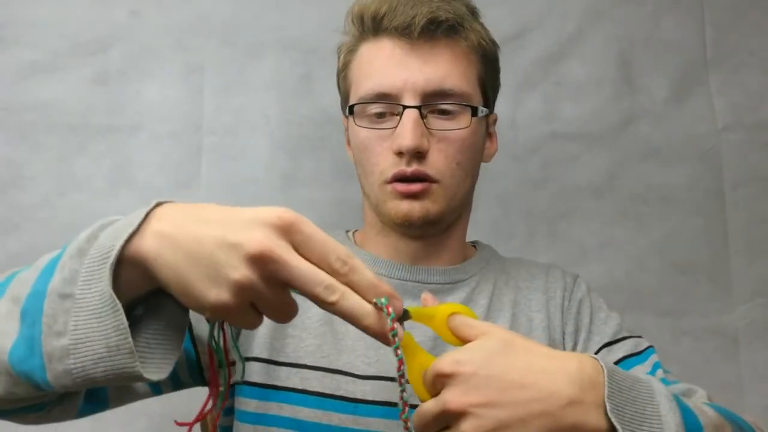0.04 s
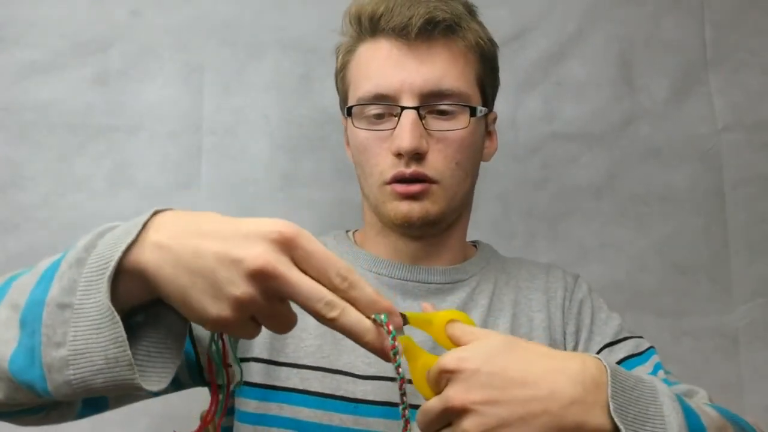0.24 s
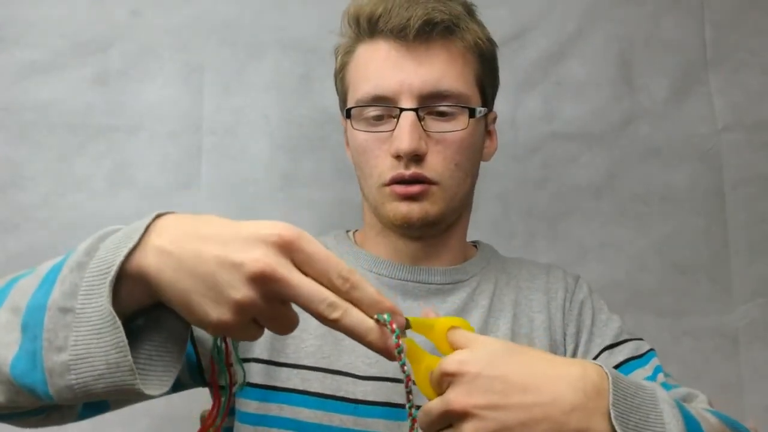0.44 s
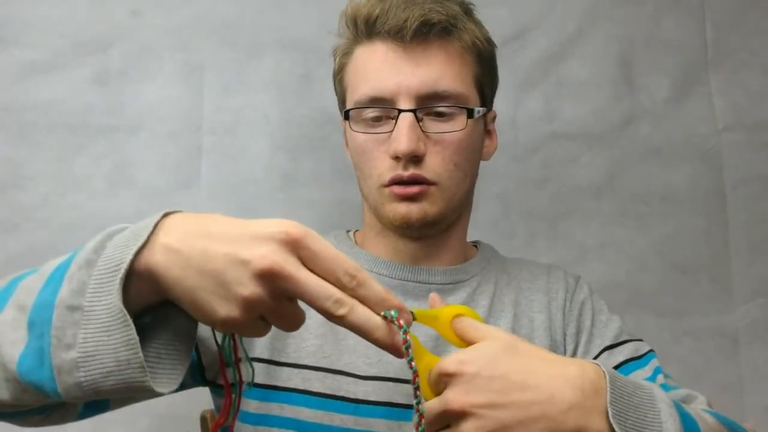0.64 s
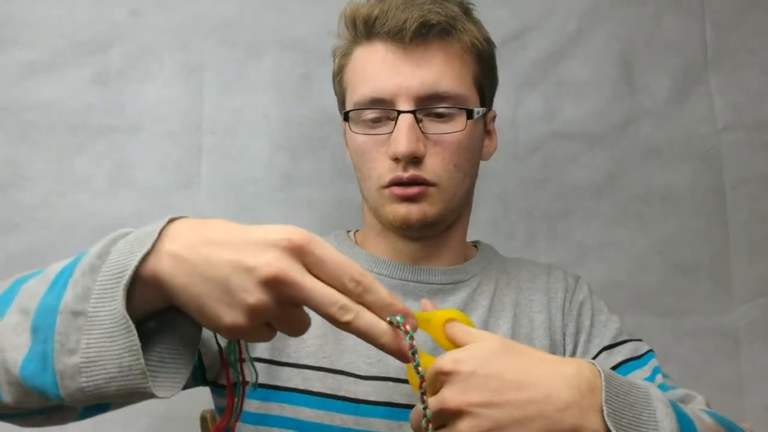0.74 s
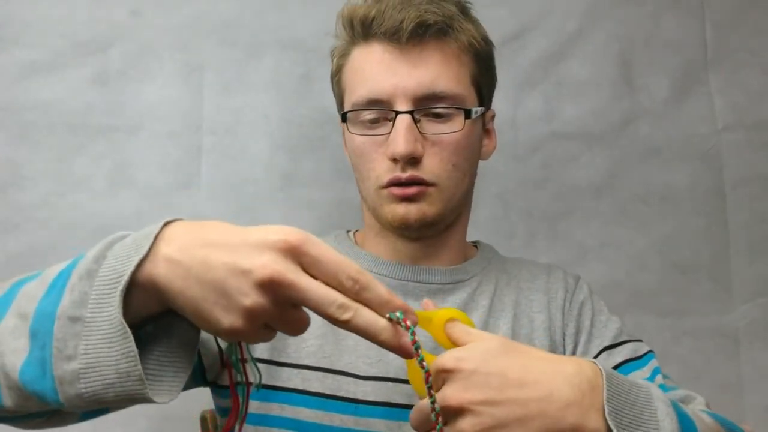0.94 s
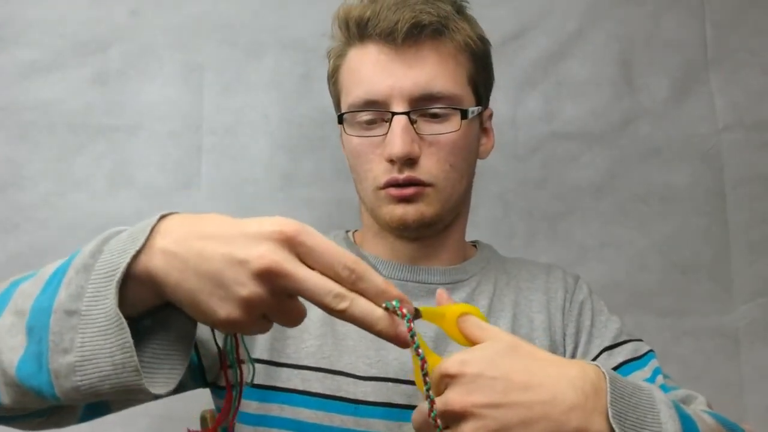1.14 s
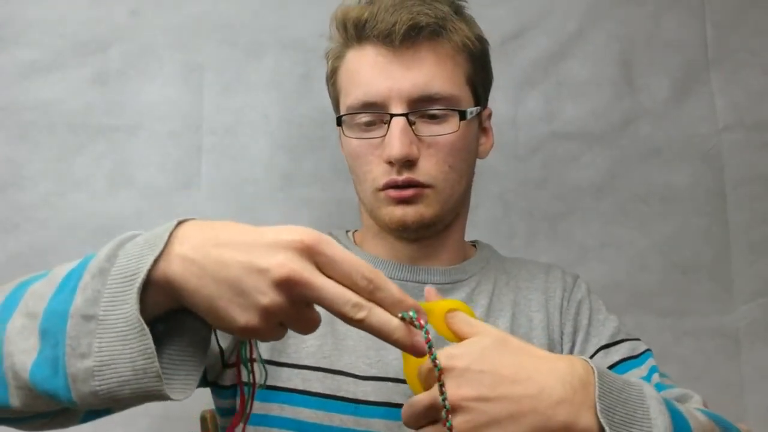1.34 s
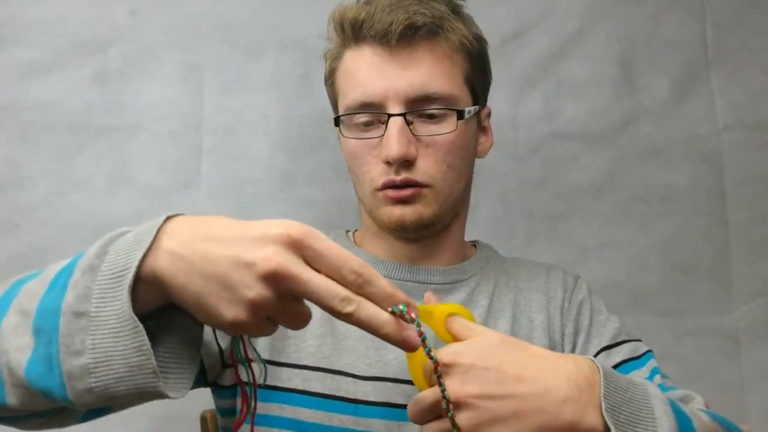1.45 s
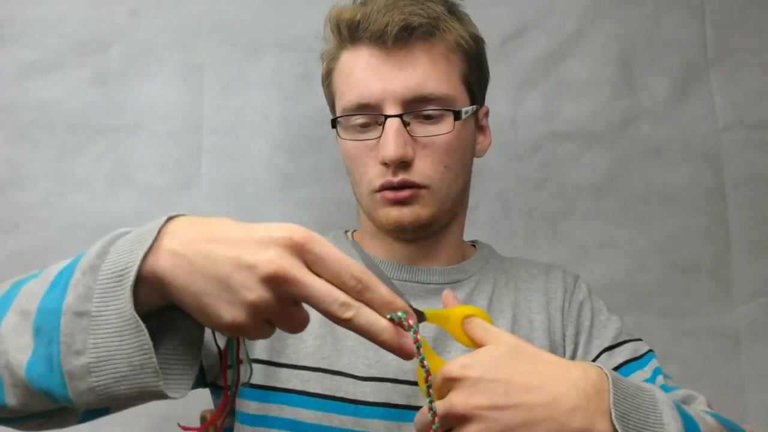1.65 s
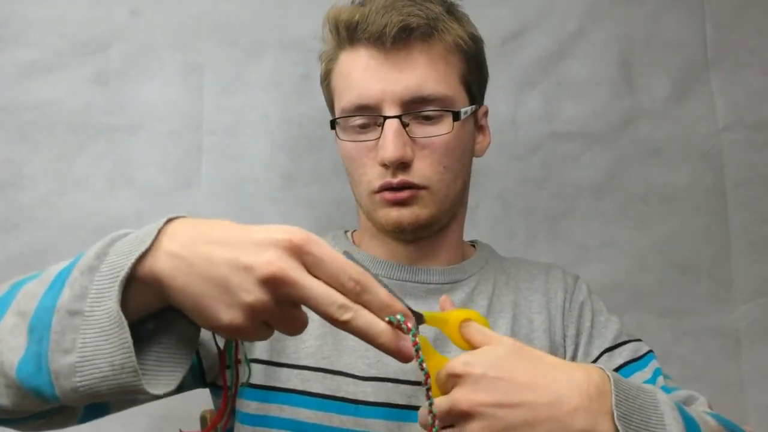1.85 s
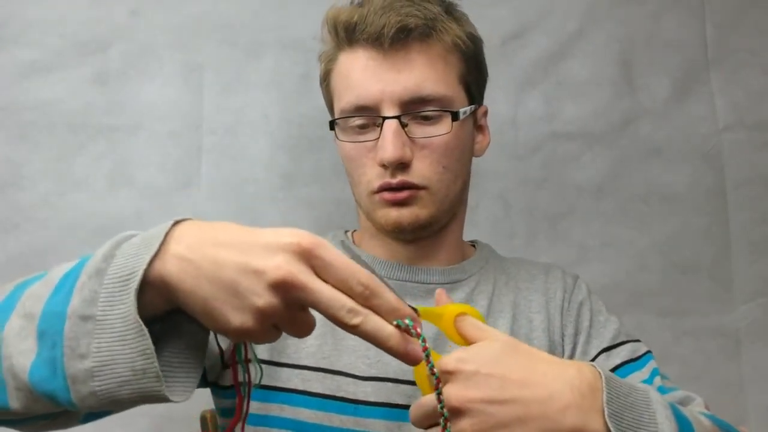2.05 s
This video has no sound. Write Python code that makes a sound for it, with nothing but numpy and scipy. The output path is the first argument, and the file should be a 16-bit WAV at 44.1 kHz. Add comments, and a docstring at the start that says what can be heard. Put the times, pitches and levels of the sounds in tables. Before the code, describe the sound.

Small scissors cut braided thread, close and slightly to the left. A brief crunch of parting strands at 0.1 seconds leads to one sharp, bright metallic snap at 0.3, by far the loudest sound. The thread then rasps softly along the blades, with faint clicks around 1.2 and 1.4 seconds and a small crunchy snip at 1.9. The quiet room adds a short echo and faint hiss.

```python
"""Small scissors cutting braided thread

In a quiet room, a little to the left, the blades snap shut once, hard, and ring the hand-damped steel.
Smaller crunches and short notes come as strands part and the blades catch. Between them the thread
rasps softly along the steel. Near walls echo the snap and crunches, over a low rumble and hiss."""
import sys
import numpy as np
from scipy import signal
from scipy.fft import rfft, irfft, next_fast_len
from scipy.io import wavfile
from scipy.ndimage import uniform_filter1d, map_coordinates

SR = 44100
rng = np.random.default_rng(int(sys.argv[2]) if len(sys.argv) > 2 else 0)


def wav_out(sig):
    """Save sig, one row per channel (or a flat mono array), as 16-bit PCM at SR to the path in sys.argv[1]."""
    wavfile.write(sys.argv[1], SR, np.round(np.clip(np.atleast_2d(sig).T, -1, 1) * 32767).astype(np.int16))


N = 92124

# Dull catch, then bright stop: (level [dB], low-pass corner [Hz])
BLADE_CONTACTS = [(1, 7300), (3.5, 18700)]
# Contact crack spectrum: (frequency [Hz], gain [dB])
CRACK_SPECTRUM = [(500, -36), (1900, -20), (3200, -5.5), (7000, -6.5), (11000, 2)]


def snap(start_s=.28615, gap_s=.001055, crack_t60_s=.01, low_cut_hz=870):
    """Two quick contacts ring the steel, each with a crack; the small blades radiate little bass."""
    def contacts(hz):
        return sum(amp(db) * np.exp(-2j * np.pi * hz * (start_s + k * gap_s))
                   / np.sqrt(1 + (hz / corner_hz) ** 10)
                   for k, (db, corner_hz) in enumerate(BLADE_CONTACTS))

    def radiation(hz):
        s = 1j * hz / low_cut_hz
        return s ** 2 / (1 + s + s ** 2)

    t = np.arange(N) / SR
    burst = amp(-13 - 60 * t / crack_t60_s) * rng.standard_normal((2, N))
    crack = equalised(burst, CRACK_SPECTRUM)
    ring = filtered(signal.unit_impulse(N), steel)
    blows = filtered(ring + crack, lambda hz: contacts(hz) * radiation(hz))
    return placed(blows, pan_db=3)


# Scissor resonances: (frequency [Hz], bandwidth [Hz], gain [dB])
STEEL_MODES = [(1050, 150, -11), (2015, 130, -12.5), (3020, 170, -23), (3600, 176, 2.5), (4710, 620, 6),
               (5650, 280, 2.5), (7300, 700, -8), (9520, 550, 4), (10870, 370, 5), (12130, 860, 4.5),
               (14100, 350, 2), (14770, 450, 11.5), (5680, 14, -2), (8620, 28, 2), (15000, 44, 11)]


def steel(hz):
    """Response of the scissors: broad hand-damped modes and a few narrow, lasting ones."""
    return sum(amp(db) * 1j * hz * width_hz / (mode_hz ** 2 - hz ** 2 + 1j * hz * width_hz)
               for mode_hz, width_hz, db in STEEL_MODES)


# Crunch spectrum points: (frequency [Hz])
CRUNCH_BANDS_HZ = [300, 1200, 2800, 5000, 9000, 10500, 12300, 15000]
# Parting strands: (peak time [s], level [dB], rise [s], fall [s], pan [dB], gain per band [dB] ...)
STRAND_BREAKS = [ (0.0515, -27.5, 0.0017, .0014, 8, -38, -36, -9, -12, -20, -7.5, 3, 4),
                 (0.1063, -33, 0.00046, 0.0044, 2.6, -1, -1.5, 6.5, -10, 6, -4, 0, -10),
                 (0.1104, -22.5, 0.0017, 0.0013, 3.6, -12, -7, -8.5, -8, 1.5, -4, 7.5, -12),
                 (1.2128, -33.5, 0.002, .007, 2.1, -15, -40, 6.5, 3.5, 7.5, -3, 10.5, -4),
                 (1.4062, -35, 0.00092, 0.0064, 9, -23, 4.5, 3, 4.5, -1, 2.5, -2, -8),
                 (1.9288, -33.5, 0.0057, 0.0054, 5.1, -17, -2, -3, -3, -2, -8, -5, -1),
                 (1.933, -26, 0.0016, 0.0048, 4.3, -19, -15, -9, -5, -4, -4, 6, -9)]


def crunches(fibres_per_s=5000, ring_mix=.8):
    """Fibres part in quick swelling clusters of ticks, partly coloured by the steel."""
    t, out = np.arange(N) / SR, np.zeros((2, N))
    for peak_s, db, rise_s, fall_s, pan_db, *bands_db in STRAND_BREAKS:
        ticks = rng.choice([-1, 1], N) * (rng.random(N) < fibres_per_s / SR)
        ticks = ticks + .22 * rng.standard_normal(N)
        ringing = unit(ticks) + ring_mix * unit(filtered(ticks, steel))
        crunch = coloured(ringing, list(zip(CRUNCH_BANDS_HZ, bands_db)))
        swell = np.exp(-np.maximum((peak_s - t) / rise_s, (t - peak_s) / fall_s))
        out += placed(amp(db) * swell * crunch, pan_db)
    return out


# Handle and blade notes: (time [s], frequency [Hz], level [dB], T60 [s])
KNOCK_NOTES = [(.107, 322, -43.5, 0.014), (.1082, 2310, -39, .02), (1.2117, 2030, -46, 0.034),
               (1.2126, 3600, -41, .01), (1.407, 4320, -37, .012), (1.9348, 1275, -39, 0.041)]


def knocks():
    """Handles and blades ring briefly as strands give."""
    t, out = np.arange(N) / SR, np.zeros(N)
    for start_s, hz, db, t60_s in KNOCK_NOTES:
        age_s = np.maximum(t - start_s, 0)
        out += amp(db - 60 * age_s / t60_s) * np.sin(2 * np.pi * hz * age_s)
    return placed(out, pan_db=.88)


# Rasp spectrum points: (frequency [Hz])
RASP_BANDS_HZ = [500, 1100, 2400, 4200, 6000, 8000, 11000, 15000]
# Thread slides: (start [s], time to mid-fade [s], ridge [Hz], level [dB], gain per band [dB] ...)
THREAD_STROKES = [ (.03, 0.1, 4100, -46.5, -26, -29, -4, -1, -2, -1, -6, -1),
                  (.48, 0.059, 3600, -49.5, -6, -3, 1, 0, -3, -4, -2, -2),
                  (0.829, .08, 3400, -47, -22, 0, -0.5, -3, -3, -3, -5.5, -15),
                  (1.008, .16, 3850, -47, -20, -10, 1, 1, -3.5, -1, -10.5, -9),
                  (1.2, 0.097, 7200, -47.5, -8, -9, -14, -11, -2, 1, -4, -13),
                  (1.375, 0.076, 9100, -47.5, -14, -2, -1, 7, -11, 3, 1, -6),
                  (1.419, 0.15, 1500, -45, -21, 0, -5, 0.5, -4.5, -4, -7.5, -12.5),
                  (1.659, 0.11, 4630, -47.5, -10, -6, 2, 1, -2, -2.5, -6, -5),
                  (1.74, 0.061, 2700, -51, -11, 0, 6, 2, -5, 1, -8, -7),
                  (2.025, 0.056, 14000, -43, -22, -1, -1, 4.5, -6, -3, 1, -2),
                  (1.93, .03, 9500, -40, -20, -13, -9, 2, 11, 3, 0, -4)]


def rasps(rise_s=.027, fall_s=.1, grain_depth=.14, ridge_db=5, ridge_octaves=.14):
    """Soft grainy friction of thread on steel; each stroke favours one narrow band."""
    t, out = np.arange(N) / SR, np.zeros((2, N))
    for start_s, length_s, ridge_hz, db, *bands_db in THREAD_STROKES:
        def ridge(hz):
            return amp(ridge_db * np.exp(-(np.log2((hz + 1) / ridge_hz) / ridge_octaves) ** 2))

        noise = rng.standard_normal((3, N))  # left, right, common
        roughness = unit(uniform_filter1d(rng.standard_normal(N), size=90))
        grains = filtered(noise * np.exp(grain_depth * roughness), ridge)
        friction = coloured(grains[:2] + .1 * grains[2], list(zip(RASP_BANDS_HZ, bands_db)))
        fade_in = np.clip((t - start_s) / rise_s, 0, 1)
        fade_out = np.clip((start_s + length_s - t) / fall_s + .5, 0, 1)
        out += amp(db) * fade_in * fade_out * friction
    return panned(out, pan_db=2)


# Diffuse decay: (frequency [Hz], T60 [s])
TAIL_DECAY = [(300, 0.36), (3000, 0.24), (8000, 0.3), (15000, 0.14)]
# Early reflections: (delay [s], gain [dB])
WALL_ECHOES = [(.0045, -14), (.0112, -33), (.0145, -35), (.022, -20)]
# Colour of echoes and tail: (frequency [Hz], gain [dB])
ROOM_SPECTRUM = [(300, -11), (1000, -7), (2700, 5.5), (4700, -7), (8000, 2.5), (12000, -7.5), (15000, 4.5)]


def room(source, build_s=.015):
    """Near walls return a few echoes and a short diffuse tail, different on each side."""
    hz, t, noise = signal.stft(rng.standard_normal((2, SR // 2)), SR, nperseg=256)
    decay = amp(-60 * t / along(TAIL_DECAY, hz)[:, None])
    build = 1 - np.exp(-t / build_s)
    response = signal.istft(noise * decay * build, SR, nperseg=256)[1]
    response *= amp(-7) / np.linalg.norm(response[0])
    for delay_s, db in WALL_ECHOES:
        arrivals_s = np.abs(delay_s + rng.normal(0, .0004, 2))
        response[[0, 1], (arrivals_s * SR).astype(int)] += amp(db)
    wet = signal.fftconvolve(source[None], response, axes=1)[:, :N]
    return equalised(wet, ROOM_SPECTRUM)


# Room noise: (frequency [Hz], relative density [dB])
AIR_SPECTRUM = [(25, -2.5), (45, -7), (62, -0.5), (100, -6), (180, -9.5), (330, -14), (560, -21),
                (1100, -15.5), (2200, -18), (3500, -17.5), (6000, -18.5), (15500, -24.5)]
# Stereo width: (frequency [Hz], side over mid [dB])
AIR_WIDTH = [(60, -19), (110, -12), (200, -3), (380, 4.5), (700, 7), (1290, -4.5), (2380, 1.5), (4400, 0.5),
             (8120, 0), (15000, 0.5)]


def air(mid_db=-50.5, rumble_hz=131, swing_db=1.5, swing_points_per_s=14.44):
    """Room hiss and a gently heaving rumble, near mono in the bass and wide above."""
    mid = coloured(rng.standard_normal(N), AIR_SPECTRUM)
    side = equalised(coloured(rng.standard_normal(N), AIR_SPECTRUM), AIR_WIDTH)
    noise = amp(mid_db) * np.array([mid + side, mid - side])
    rumble = filtered(noise, lambda hz: 1 / (1 + (hz / rumble_hz) ** 4))
    hiss = noise - rumble
    swell = map_coordinates(rng.standard_normal(200), [np.arange(N) * swing_points_per_s / SR])
    return hiss + rumble * unit(amp(swing_db * swell))


def amp(db):
    """Decibels to gain."""
    return 10 ** (np.asarray(db) / 20)


def unit(x):
    """Scale to rms 1."""
    return x / np.sqrt(np.mean(x ** 2) + 1e-20)


def along(points, hz):
    """Interpolate (frequency [Hz], value) points on a log axis."""
    points_hz, values = np.transpose(points)
    return np.interp(np.log(hz + 1), np.log(points_hz + 1), values)


def filtered(x, response):
    """Apply a complex frequency response."""
    size = next_fast_len(N + SR // 2)
    return irfft(rfft(x, size) * response(np.fft.rfftfreq(size, 1 / SR)), size)[..., :N]


def equalised(x, points):
    """Apply a (frequency [Hz], gain [dB]) curve."""
    return filtered(x, lambda hz: amp(along(points, hz)))


def coloured(x, points):
    """Equalise, then scale to rms 1."""
    return unit(equalised(x, points))


def panned(x, pan_db):
    """Left louder than right by pan_db."""
    return x * amp(np.array([[pan_db], [-pan_db]]) / 2)


def placed(x, pan_db, lead_s=.00008, max_lead_rad=1.61):
    """A near source: louder on the left, and earlier by at most about a quarter cycle."""
    def phase_shift(hz):
        lead_rad = max_lead_rad * np.tanh(2 * np.pi * hz * lead_s / max_lead_rad)
        return np.exp(.5j * lead_rad * np.array([[1], [-1]]))

    return panned(filtered(x, phase_shift), pan_db)


def scene():
    """The scissors, their echo and the still room."""
    cuts = snap() + crunches()
    return cuts + room(cuts[0]) + knocks() + rasps() + air()


def record(dry):
    """Round off the highest peak, then limit the bandwidth."""
    ceiling, top_hz = .92, 15800
    rounded = dry / (1 + np.abs(dry / ceiling) ** 6) ** (1 / 6)
    return filtered(rounded, lambda hz: 1 / np.sqrt(1 + (hz / top_hz) ** 200))


dry = scene()
out = record(dry)
wav_out(out)
```